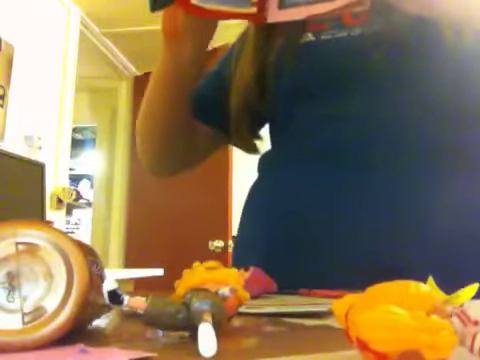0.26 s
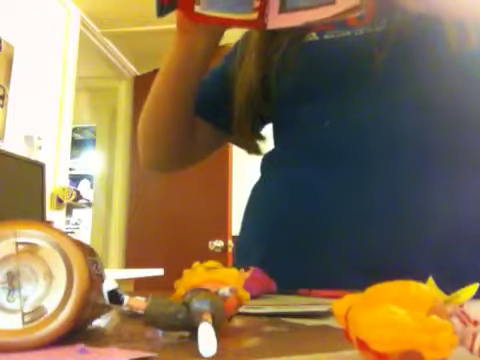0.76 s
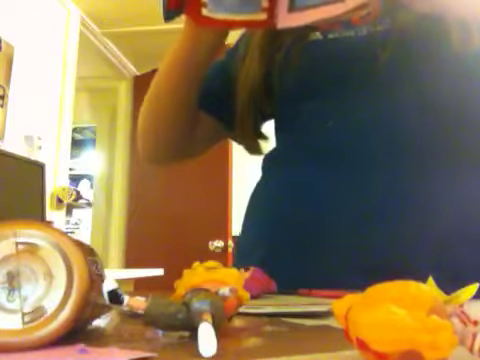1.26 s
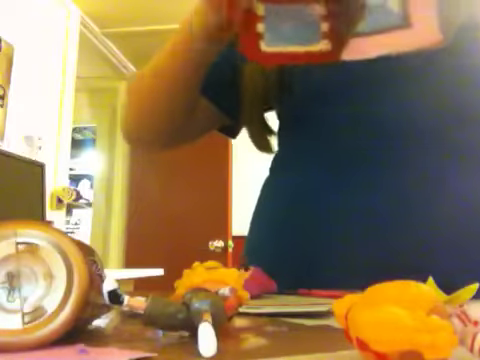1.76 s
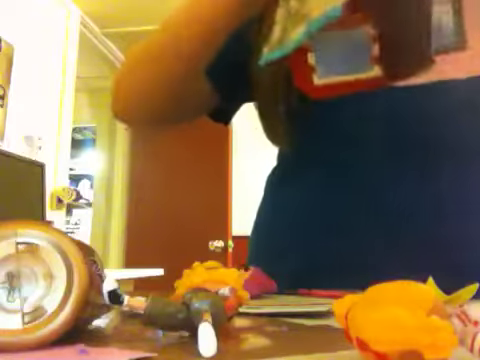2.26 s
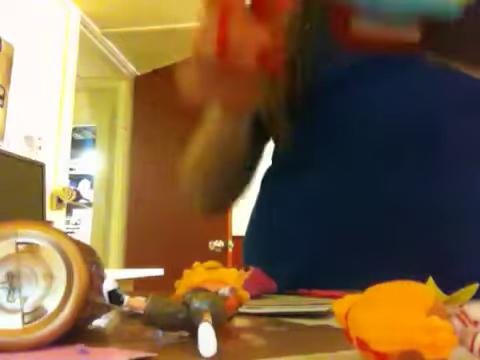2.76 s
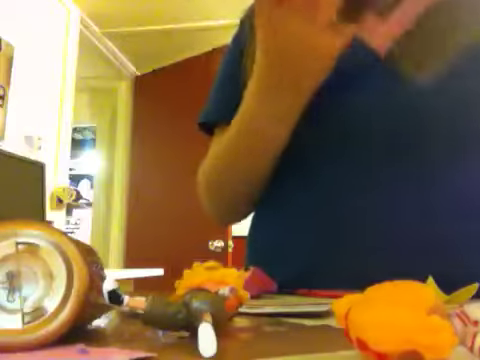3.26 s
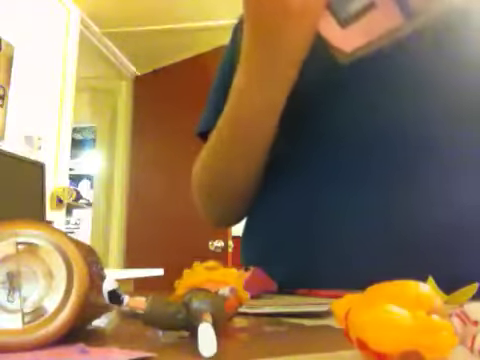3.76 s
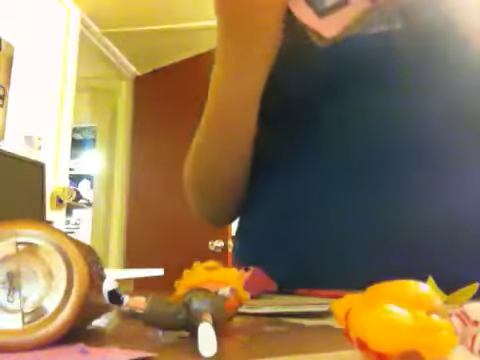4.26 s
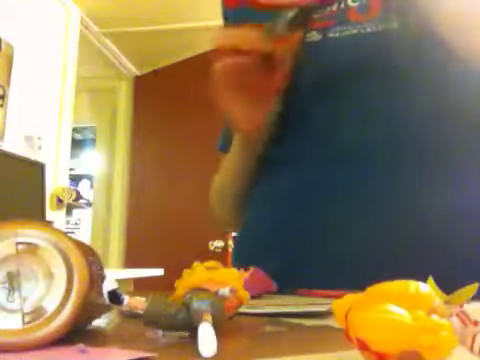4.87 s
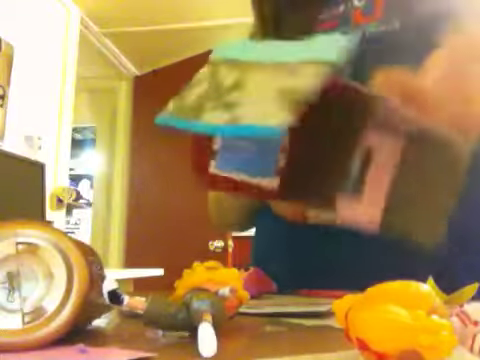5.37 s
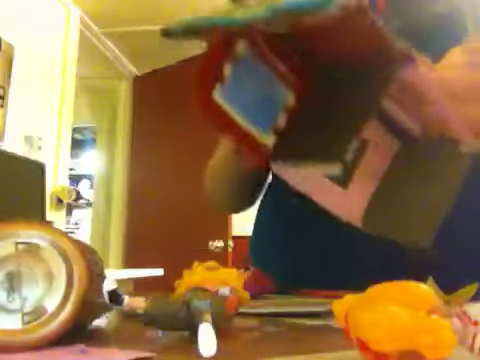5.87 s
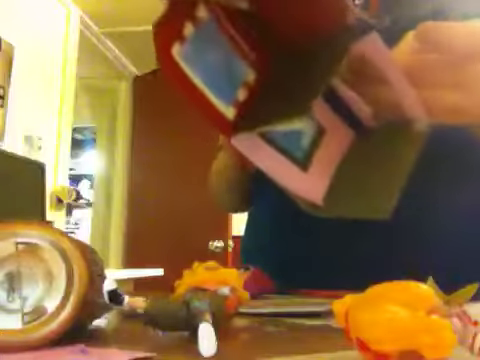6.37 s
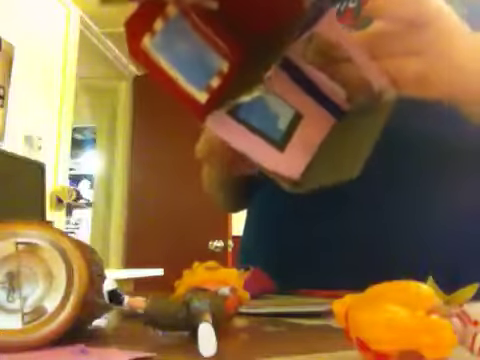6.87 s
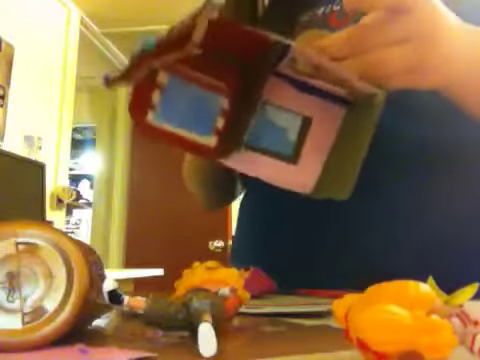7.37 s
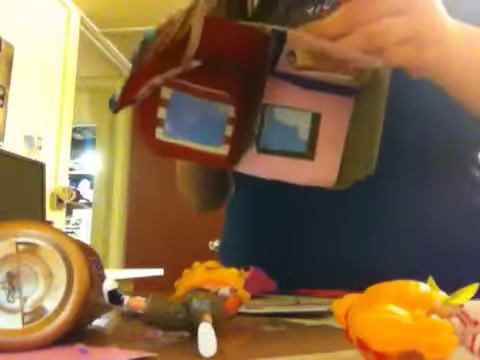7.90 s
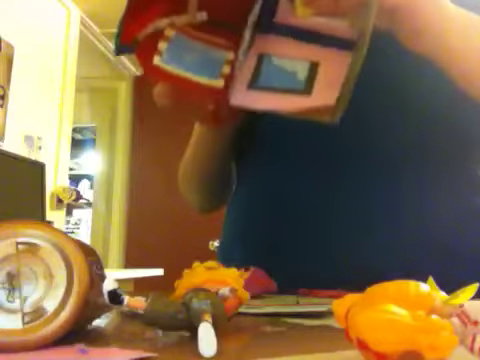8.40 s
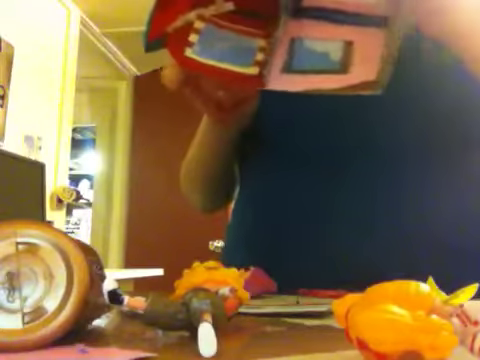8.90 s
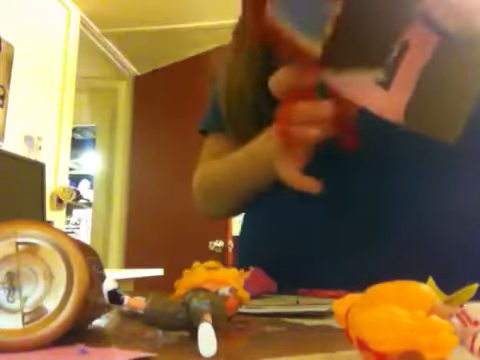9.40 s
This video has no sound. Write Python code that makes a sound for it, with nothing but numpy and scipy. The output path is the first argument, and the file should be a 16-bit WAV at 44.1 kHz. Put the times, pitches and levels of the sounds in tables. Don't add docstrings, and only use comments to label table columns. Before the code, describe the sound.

Close cardboard handling in a small room: soft brushes and rustles, dry taps and sharp nail snaps, over a faint steady motor hum.

```python
import sys
import numpy as np
from scipy import signal
from scipy.fft import rfft, irfft, next_fast_len
from scipy.io import wavfile
from scipy.ndimage import uniform_filter1d

SR = 44100
rng = np.random.default_rng(int(sys.argv[2]) if len(sys.argv) > 2 else 0)


def linear_from_db(decibels):
    return 10 ** (np.asarray(decibels, float) / 20)


def generate_wav(signal):
    frames = np.transpose(np.atleast_2d(signal))
    scaled = np.clip(frames, -1, 1) * 32767
    pcm = np.round(scaled).astype(np.int16)
    wavfile.write(sys.argv[1], SR, pcm)


N = 425124

# multiple of the shaft speed, level in dB, wavering in dB.
MOTOR_ORDERS = [(4, -50, 2), (5, -57.5, 3.5), (6, -63, 2), (7, -44, 0.5), (8, -69, 6.5), (11, -58, 0.5),
                (14, -60, 1), (18, -61.5, 5)]
SHAFT_HZ = 39.42

# frequency in Hz, density in dB per Hz.
AIR_COLOUR = [(15, -65), (25, -27), (82, -26), (149, -12), (217, -15.5), (277, -14), (373, -20), (427, -19),
              (503, -19.5), (677, -11.5), (818, -18.5), (1740, -32.5), (1940, -36.5), (8590, -43),
              (16000, -51)]
AIR_DB = -60.5
# frequency in Hz, width in Hz, lift in dB.
AIR_RESONANCES = [(158, 19, 6), (383, 27, -7.5), (700, 420, 0), (1750, 51, 6), (2700, 190, 4.5)]

# frequency in Hz, density in dB per Hz.
CARD_COLOUR = [(180, -30), (300, 6), (326, -22), (433, -1), (502, -6.5), (801, 6), (1010, 3.5),
               (1660, -0.5), (2030, -18), (2740, -6), (3580, -12), (8090, -19.5), (9710, -22), (10400, -23),
               (16000, -39)]
# frequency in Hz, width in Hz, lift in dB.
CARD_RESONANCES = [(2820, 340, 4), (1786, 210, 9), (1270, 250, 2.5), (4680, 1100, 3), (5780, 150, 5),
                   (6300, 58, 6), (8380, 1400, 5.5), (10350, 360, 2.5), (2070, 210, 1.5)]

# start in seconds, length in seconds, then end levels of drumming, scrape and hiss in dB.
SLIDES = [
    (0.063, 0.067, -39, -42, -44),
    (0.547, 0.073, -45, -45.5, -46),
    (.994, 0.041, -35, -39.5, -37.5),
    (1.965, 0.075, -39.5, -52, -49),
    (3.429, 0.073, -37.5, -50, -46),
    (6.747, 0.028, -25.5, -36, -38),
    (8.477, 0.029, -46, -47, -47.5),
]
# peak in seconds, fall in seconds, then panel drumming, box-edge scrape and paper hiss in dB.
FLICKS = [(1.49, 0.19, -41, -43.5, -41.5), (1.694, 0.094, -35.5, -58, -40), (3.026, .15, -33.5, -37, -44),
          (3.15, .1, -40, -51, -41.5), (3.22, 0.049, -36, -49, -43), (4.504, .076, -41, -42, -50),
          (6.912, 0.24, -41, -58, -44.5), (7.15, .1, -50, -51, -57), (7.852, 0.075, -35, -48, -46),
          (8.517, 0.052, -44, -36, -45), (9.014, 0.047, -32, -53, -45), (9.344, 0.037, -29.5, -52, -38),
          (9.53, 0.094, -40, -47, -46)]
# peak in seconds, fall in seconds, then drumming, scrape and hiss in dB.
BRUSHES = [(.78, 0.13, -42, -53, -54), (1.202, .12, -39.5, -50, -45), (2.162, 0.028, -30, -66, -46),
           (2.456, 0.099, -39, -63, -43), (3.298, 0.084, -35.5, -39, -38), (4.384, 0.03, -44, -61, -42),
           (5.14, 0.069, -41, -37, -43), (5.19, 0.18, -41.5, -48, -48.5), (5.686, .09, -32.5, -44.5, -50.5),
           (5.85, 0.18, -39, -45, -60), (7.38, 0.043, -58, -63, -54), (7.648, 0.087, -38.5, -48, -39.5),
           (8.036, 0.086, -44.5, -65, -67)]
# start in seconds, length in seconds, then drumming, scrape and hiss in dB.
RUSTLES = [
    (2.56, 0.17, -69, -67, -60.5),
    (4.03, 0.096, -49.5, -62, -56),
    (4.157, 0.13, -47, -73, -53),
    (4.723, 0.27, -52.5, -66, -63),
    (6.123, 0.073, -47, -58, -72),
    (6.262, 0.097, -50, -61, -58.5),
    (7.195, 0.33, -51, -74, -70),
    (7.774, 0.077, -48, -67, -56.5),
    (8.654, 0.17, -54, -62, -59.5),
    (9.04, .24, -48.5, -65, -50.5),
]
# drumming, scrape and hiss in dB.
STROKE_EDGE_DB = (-24.5, -25, -23.5)
# drumming, scrape and hiss in dB.
SLIDE_SWELL_DB = (5, 5, 6.5)
RUSTLE_SWELL_DB = (3, 0, 1)
FLICK_RISE_S, BRUSH_RISE_S = 0.0097, 0.044
SLIDE_RISE_S, SLIDE_FALL_S = 0.037, 0.055
RUSTLE_RISE_S, RUSTLE_FALL_S = 0.026, 0.059

# start in seconds, snap peak in dB, panel thud over snap in dB,
# crispness over snap in dB, panel pitch in Hz.
PATS = [(0.2935, -31.5, 2, -7, 627), (0.7658, -38.5, 5, -5.5, 900), (2.163, -17, -7, -12, 724),
        (2.4902, -33, -3, -6, 750), (3.7055, -36, -1, -25, 750), (3.7918, -43, 5, -16, 675),
        (5.68, -44, 8, -25, 1670), (5.8805, -35.5, 4.5, -15, 1640), (6.9114, -23.5, 2.5, -6.5, 990),
        (8.494, -23.5, -2, -10, 764), (9.2904, -29.5, -2, -17, 795), (9.5325, -26.5, 3.5, -16, 1070)]
# start in seconds, snap peak in dB, crispness over snap in dB.
TICKS = [
    (0.5372, -42, -2),
    (2.6507, -48, 5.5),
    (2.7583, -42.5, -4.5),
    (4.7829, -31, -19),
    (4.8663, -23, -18.5),
    (5.1347, -26.5, -30),
    (7.3692, -33, -15),
    (8.7244, -33, -21),
    (8.838, -27.5, -6),
]
# start in seconds, snap peak in dB, panel thud over snap in dB,
# crispness over snap in dB, panel pitch in Hz.
TAPS = [(0.9801, -39.5, 2, 3.5, 1090), (1.278, -51, 2, 0, 720), (1.3083, -43, 6, -0.5, 705),
        (1.729, -30.5, 4, -1, 764), (1.9775, -30.5, 3, -8.5, 1330), (2.4574, -24.5, -3.5, -16, 750),
        (2.9148, -40, 2.5, -9, 766), (3.2725, -41, 6, -14, 1030), (4.2667, -36, -8, -1, 740),
        (4.3836, -48, -10, 4.5, 724), (4.5067, -39.5, 8, -6, 730), (4.7157, -35.5, -2, -10, 646),
        (7.0879, -30, 4.5, -10, 918), (8.4731, -36, 6, -9, 860), (9.0137, -28.5, -1, -15, 700),
        (9.1696, -32, 0.5, -5, 1120), (9.346, -23.5, -8, -19, 730)]
# start in seconds, snap peak in dB, panel thud over snap in dB,
# crispness over snap in dB, panel pitch in Hz.
SNAPS = [(1.4798, -16.5, -4.5, -3, 1140), (1.591, -30, 1.5, -11, 655), (1.6905, -37, 8.5, -6, 690),
         (2.5669, -33, -5, -4.5, 650), (3.028, -19.5, 0.5, -5, 1210), (3.0486, -24.5, 4, -6, 1210),
         (3.1009, -36, 7, -4, 550), (3.1488, -28.5, -1.5, -12.5, 1180), (3.4387, -30.5, -7.5, -16, 1280),
         (5.039, -22, 1.5, -25, 800), (6.466, -37, 2.5, 1, 653), (6.946, -41, 18, -12, 726),
         (6.9667, -9.5, 0, -10.5, 1060), (7.677, -32, 5.5, -10, 767), (8.5059, -23, 6, 3, 1120),
         (8.6807, -42.5, 9.5, 2.5, 800)]
SNAP_MS, TAP_MS, PAT_MS, TICK_MS = 2.77, 4.3, 7.6, 5
TICK_THUD_DB, TICK_PANEL_HZ = -14, 720

# start in seconds, peak in dB, pitch in Hz, t60 in seconds.
FLAP_RINGS = [(0.2935, -31, 8150, 0.007), (1.4805, -6.5, 6660, 0.0086), (1.7293, -19, 5760, 0.0077),
              (2.565, -28, 8630, 0.0078), (4.5076, -21.5, 2630, 0.016), (4.8681, -14.5, 2630, 0.008),
              (6.9667, -6.5, 4840, 0.011), (7.3668, -24, 5750, 0.0084), (7.6784, -17, 4800, 0.008),
              (8.5061, -10.5, 2720, 0.013), (8.6803, -21.5, 2830, 0.0086), (8.837, -24, 6300, 0.007),
              (9.1701, -18.5, 5200, 0.0057), (2.1655, -9.5, 10470, 0.0087)]
# start in seconds, peak in dB, pitch in Hz, t60 in seconds.
BOX_KNOCKS = [(3.028, -18.5, 443, 0.068), (3.148, -23.5, 322, 0.06), (9.531, -18, 441, 0.039),
              (0.294, -18, 740, 0.03), (1.214, -23, 1310, 0.034), (2.033, -24, 1410, 0.026),
              (2.16, -16, 780, 0.033), (5.679, -19, 1685, 0.072), (7.787, -20.5, 855, 0.022),
              (9.093, -26.5, 1140, 0.092), (9.291, -11, 765, 0.041), (9.532, -18, 1176, 0.062),
              (4.8663, -23, 1740, 0.022), (7.7872, -14, 1300, 0.0099)]

# frequency in Hz, t60 in seconds.
ROOM_DECAY = [(400, 0.23), (1500, 0.16), (4000, 0.28), (12000, 0.25)]


def evened(x):
    return x / np.sqrt(np.mean(x ** 2) + 1e-20)


def read(points, hz):
    f, value = np.transpose(points)
    return np.interp(np.log(hz + 1), np.log(f + 1), value)


def with_modes(points, modes, hz):
    bumps = sum(db / (1 + (2 * (hz - f) / width) ** 2) for f, width, db in modes)
    return read(points, hz) + bumps


def drift(rate, count):
    at = np.arange(0, N, 64)
    t = at[:, None] / SR
    f = np.geomspace(rate / 20, rate, 16)
    curves = [evened(np.sin(2 * np.pi * (f * t + phase)).sum(1)) for phase in rng.random((count, 16))]
    return [np.interp(np.arange(N), at, curve) for curve in curves]


def hum():
    turns = np.cumsum(SHAFT_HZ * (1 + 0.0012 * drift(1.515, count=1)[0])) / SR
    wavers = drift(7.0, count=len(MOTOR_ORDERS))
    out = np.zeros(N)
    for (order, db, waver_db), waver in zip(MOTOR_ORDERS, wavers):
        tone = np.sqrt(2) * np.sin(2 * np.pi * order * turns + order * order)
        out += linear_from_db(db + waver_db * waver) * tone
    return out


def air():
    frames, hz = N // 512 + 5, np.fft.rfftfreq(2048, 1 / SR)
    real, imag, patches = rng.standard_normal((frames, 1025, 3)).T
    patches = evened(uniform_filter1d(uniform_filter1d(patches, 16, 0), 6, 1))
    patchy = (real + 1j * imag) * linear_from_db(1.33 * patches)
    noise = signal.istft(patchy, nperseg=2048, noverlap=1536)[1][:N]

    colour = linear_from_db(with_modes(AIR_COLOUR, AIR_RESONANCES, hz))
    colour = colour / np.sqrt(np.mean(colour ** 2 * (hz > 1900)))
    size = next_fast_len(N)
    spectrum = rfft(evened(noise), size)
    gain = np.interp(np.linspace(0, SR / 2, len(spectrum)), hz, colour)
    return linear_from_db(AIR_DB) * irfft(spectrum * gain, size)[:N]


def causal(db):
    log_gain = np.log(linear_from_db(np.maximum(db, -100)))
    phase = -signal.hilbert(np.r_[log_gain, log_gain[-2:0:-1]]).imag[:len(db)]
    return irfft(np.exp(log_gain + 1j * phase))[:1024]


def card_bands(edge_hz, lift_db):
    hz = np.fft.rfftfreq(4096, 1 / SR)
    colour = with_modes(CARD_COLOUR, CARD_RESONANCES, hz)
    colour = colour + lift_db * np.clip(hz / 8000 - 1, 0, 1)

    def under(edge):
        return -10 * np.log10(1 + (hz / edge) ** 12)

    def over(edge):
        return -10 * np.log10(1 + (edge / (hz + 1)) ** 12)

    cuts = (under(2000), over(2100) + under(edge_hz), over(edge_hz))
    parts = [causal(colour + cut) for cut in cuts]
    return [part / np.linalg.norm(part) for part in parts]


def stroke_shapes():
    flicks = [(s, FLICK_RISE_S, 0, fall, 0, db) for s, fall, *db in FLICKS]
    brushes = [(s, BRUSH_RISE_S, 0, fall, 0, db) for s, fall, *db in BRUSHES]
    slides = [(s, SLIDE_RISE_S, hold, SLIDE_FALL_S, SLIDE_SWELL_DB, db) for s, hold, *db in SLIDES]
    rustles = [(s, RUSTLE_RISE_S, hold, RUSTLE_FALL_S, RUSTLE_SWELL_DB, db) for s, hold, *db in RUSTLES]
    return flicks + brushes + slides + rustles


def strokes(bands):
    power = np.zeros((3, N))
    for s, rise, hold, fall, swell_db, peak_db in stroke_shapes():
        corners = np.cumsum([s - rise, rise, hold, fall])
        i = np.arange(round(corners[0] * SR), min(round(corners[-1] * SR), N))
        full = np.zeros(3)
        start_db = np.subtract(STROKE_EDGE_DB, swell_db)
        shape_db = np.transpose([start_db, full - swell_db, full, STROKE_EDGE_DB])
        fade = signal.windows.tukey(len(i), 600 / len(i))
        for part, (peak, curve) in enumerate(zip(peak_db, shape_db)):
            power[part, i] += (fade * linear_from_db(peak + np.interp(i / SR, corners, curve))) ** 2

    chance = uniform_filter1d(rng.standard_normal((4, N)), 300, axis=1)
    clumps = linear_from_db(2.4 * evened(chance[0]) + 2.0 * evened(chance[1:]))
    slips = rng.standard_normal((3, N)) * linear_from_db(1.7 * np.minimum(rng.exponential(1, N), 4))
    out = np.zeros(N)
    for drive, part_power, band in zip(clumps * slips, power, bands):
        friction = evened(drive) * np.sqrt(part_power) * linear_from_db(-3.0)
        out += signal.oaconvolve(friction, band)[:N]
    return out


def bent(x, patchy_db):
    hz, t, z = signal.stft(x, SR, nperseg=256, noverlap=192)
    patches = rng.standard_normal((len(t), len(hz)))
    patches = evened(uniform_filter1d(uniform_filter1d(patches, 12, 0), 4, 1))
    return signal.istft(z * linear_from_db(patchy_db * patches.T), SR, nperseg=256, noverlap=192)[1][:N]


def contacts():
    ticks = [(s, db, TICK_THUD_DB, crisp_db, TICK_PANEL_HZ) for s, db, crisp_db in TICKS]
    kinds = ((SNAPS, SNAP_MS), (TAPS, TAP_MS), (PATS, PAT_MS), (ticks, TICK_MS))
    return sorted((*row, ms) for rows, ms in kinds for row in rows)


def blows(bands):
    out, t = np.zeros(N + 4096), np.arange(2600) / SR
    events = contacts()
    for (s, db, thud_db, crisp_db, hz, ms), noise in zip(events, rng.standard_normal((len(events), len(t)))):
        contact = ms / 1000
        onset = 1 - np.exp(-t / (0.043 * contact))
        drag = 0.38 * np.exp(-t / 0.011)
        shape = onset * (np.exp(-(t / contact) ** 2) + drag)
        ring = np.exp(-t[:800] / 0.0022) * np.sin(2 * np.pi * hz * t[:800])
        panel = bands[0] + 1.4 * np.pad(ring, (0, 224)) / np.linalg.norm(ring)
        parts = [signal.fftconvolve(noise * shape, band) for band in (panel, *bands[1:])]
        thud, snap, crisp = [p / np.sqrt(uniform_filter1d(p ** 2, 90).max()) for p in parts]
        sound = linear_from_db(thud_db + 8.0) * thud + snap + linear_from_db(crisp_db + 6.5) * crisp
        at = round(s * SR)
        out[at:at + len(sound)] += linear_from_db(db - 11.0) * sound
    return out[:N]


def rings(events, offset_db, rough):
    out, t = np.zeros(N + 8192), np.arange(3000) / SR
    for (s, db, hz, t60), noise in zip(events, rng.standard_normal((len(events), 400))):
        mode = linear_from_db(-60 * t / t60) * np.sin(2 * np.pi * hz * t)
        contact = rough * noise * np.exp(-t[:400] / 0.00077)
        sound = signal.fftconvolve(np.r_[1, contact], mode)
        at = round(s * SR)
        out[at:at + len(sound)] += linear_from_db(db + offset_db) * sound / abs(sound).max()
    return out[:N]


def room(x):
    echoes = np.zeros(SR // 2)
    at = np.arange(200, SR // 2 - 20, 20)
    echoes[at + rng.integers(0, 20, len(at))] = rng.choice([-1., 1.], len(at))
    hz, t, z = signal.stft(echoes, SR, nperseg=256)
    decay = linear_from_db(-60 * t / read(ROOM_DECAY, hz)[:, None])
    tail = signal.istft(z * decay, SR, nperseg=256)[1]
    return signal.fftconvolve(x, tail / np.linalg.norm(tail))[:N]


def scene():
    friction = bent(strokes(card_bands(3400, lift_db=7.0)), patchy_db=2.4)
    hands = blows(card_bands(6000, lift_db=0)) + friction
    flaps = rings(FLAP_RINGS, offset_db=-7.5, rough=0.42)
    box = rings(BOX_KNOCKS, offset_db=-7.5, rough=0.097)
    modes = flaps + box
    card = hands + modes + linear_from_db(-13.0) * room(hands + 0.68 * modes)
    no_bass = signal.butter(2, 220, "high", fs=SR, output="sos")
    card = signal.sosfilt(no_bass, card)
    return (card + hum() + air())[None]


def top_cut(x):
    return signal.sosfilt(signal.butter(12, 16650, fs=SR, output="sos"), x)


def record(dry):
    lowpass = signal.firwin(301, 15900, window=("kaiser", 6), fs=SR)
    mix = signal.oaconvolve(dry[0], lowpass, "same")[None]
    return top_cut(mix)


dry = scene()
out = record(dry)
generate_wav(out)
```